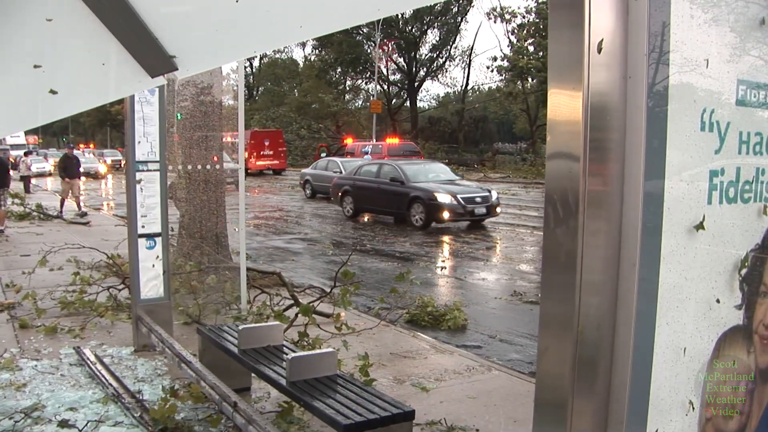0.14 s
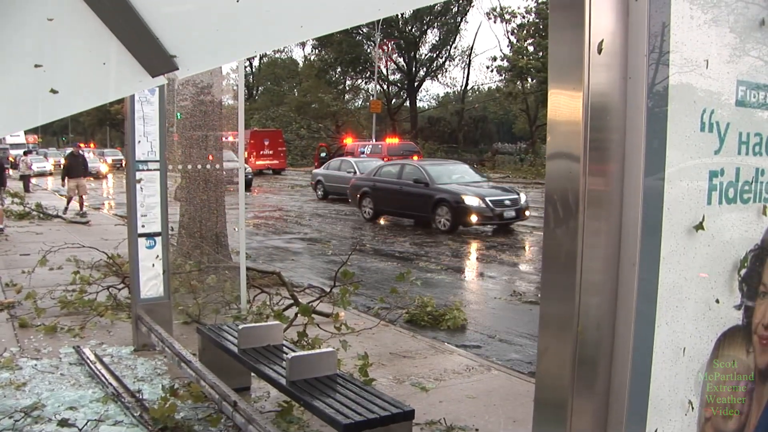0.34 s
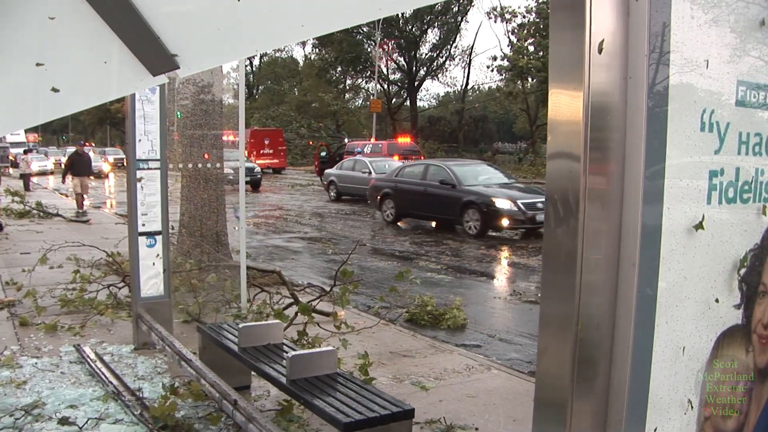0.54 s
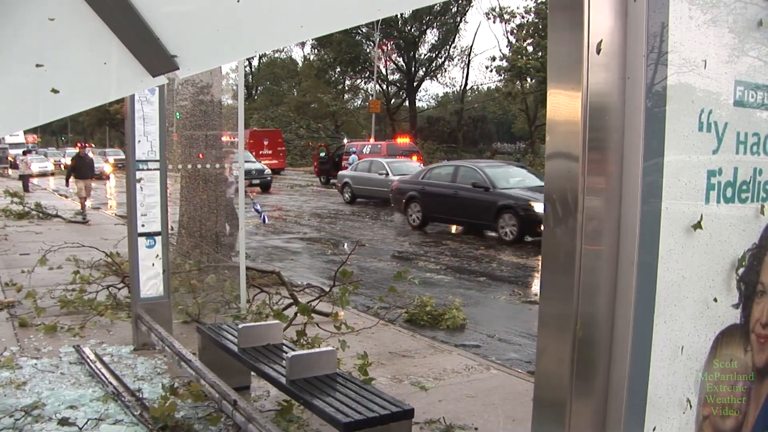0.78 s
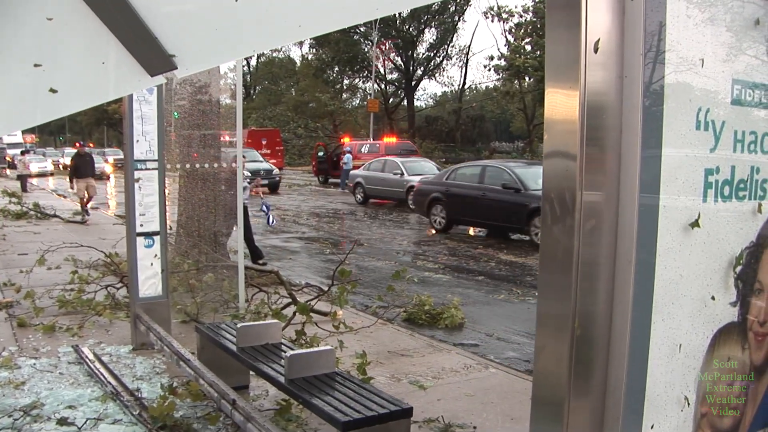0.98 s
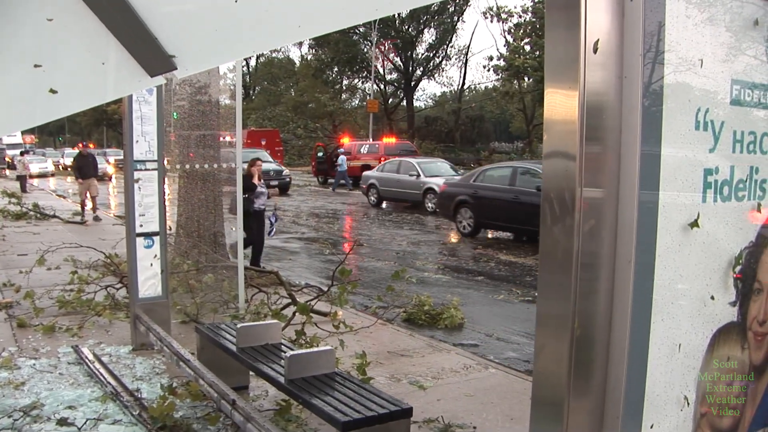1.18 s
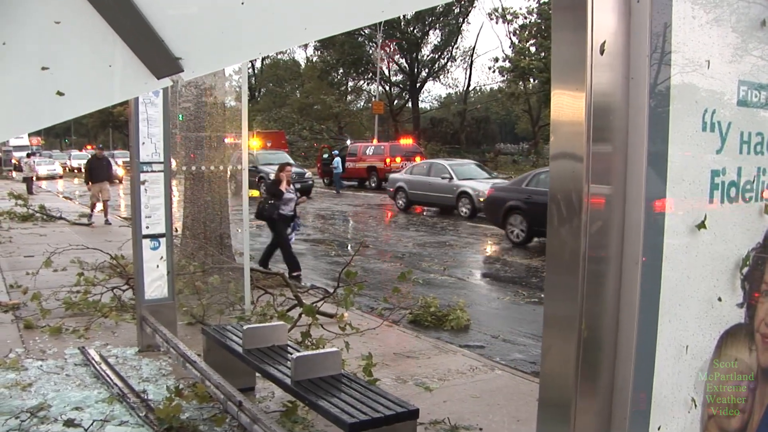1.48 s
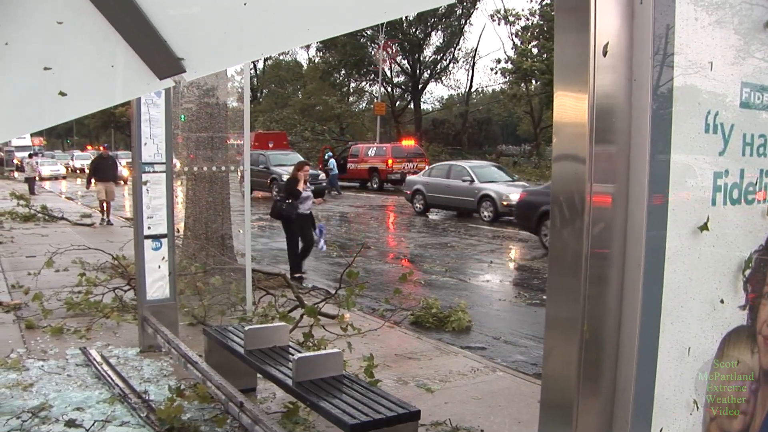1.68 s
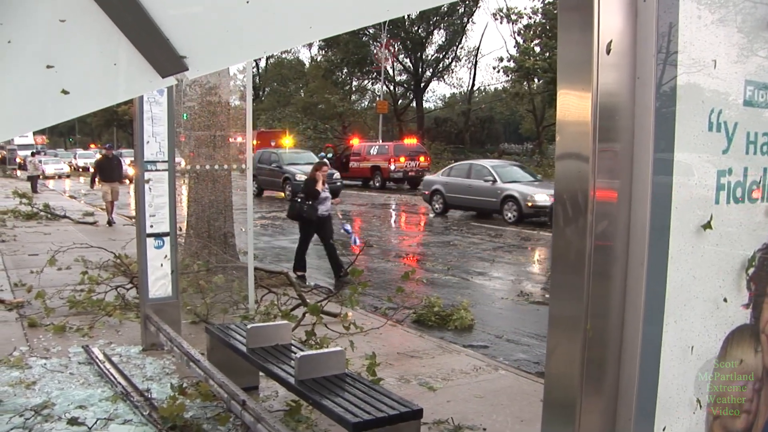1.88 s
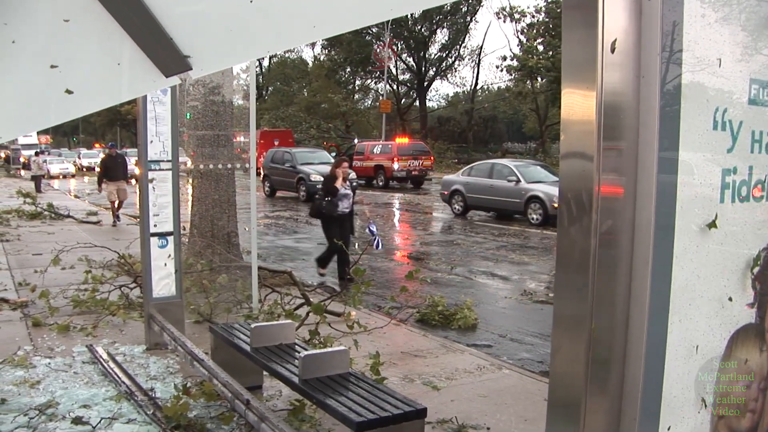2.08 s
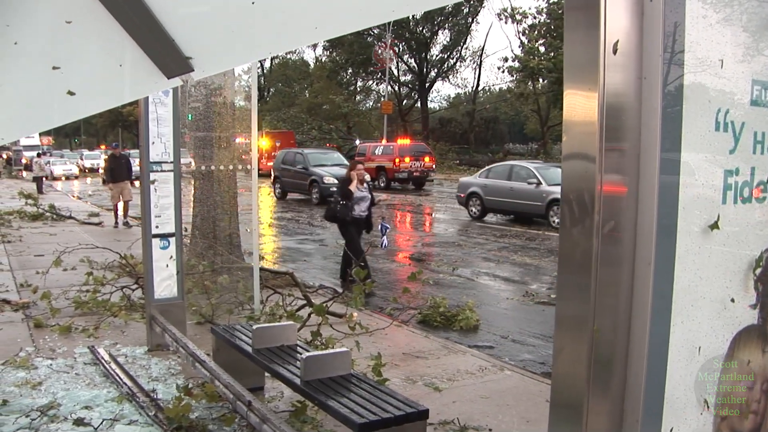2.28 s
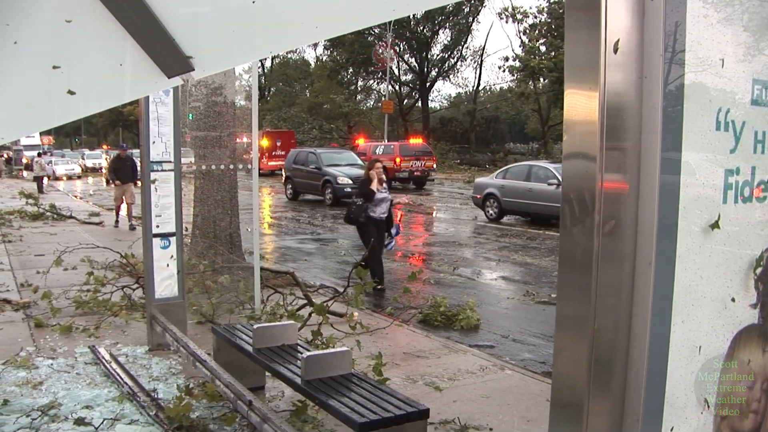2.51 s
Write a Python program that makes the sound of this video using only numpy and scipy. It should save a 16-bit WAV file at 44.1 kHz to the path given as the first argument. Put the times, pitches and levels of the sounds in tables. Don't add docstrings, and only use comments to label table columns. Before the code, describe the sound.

Car tyres hiss and spit on a wet city road, gradually moving away, over a low lorry idle that sinks in pitch; a faint distant horn toot midway, heard in stereo from a kerbside shelter.

```python
import sys
import numpy as np
from scipy import signal
from scipy.fft import rfft, irfft, next_fast_len
from scipy.io import wavfile
from scipy.ndimage import uniform_filter1d

SR = 44100
rng = np.random.default_rng(int(sys.argv[2]) if len(sys.argv) > 2 else 0)


def level_to_linear(level):
    exponent = np.asarray(level, float) / 20
    return 10 ** exponent


def dump_mix(stems):
    frames = np.atleast_2d(stems).T
    limited = np.clip(frames, -1, 1)
    pcm = np.round(limited * 32767).astype(np.int16)
    wavfile.write(sys.argv[1], SR, pcm)


N = 116865
T = np.arange(N) / SR

# centre [t/s], length [t/s], [level/dB]
GUSTS = [
    (1.772, 0.063, -57),
    (2.4, 0.073, -59),
]
# [multiple of pitch], [level/dB]
HORN_ORDERS = [(1, 0), (6, -11), (8, -8), (9, -9), (10, -5)]
# [t/s], [f/Hz], [level/dB]
PUMP_WHINE = [(0, 1236, -60), (.55, 1236, -53), (1.0, 1236, -57), (1.5, 1236, -55), (2.05, 1237, -56),
              (2.15, 1238, -49), (2.33, 1236, -49), (2.42, 1236, -58), (2.65, 1236, -62)]
SHIELD_RATTLE = [(1.95, 2452, -78), (2.15, 2455, -47), (2.3, 2450, -46), (2.36, 2440, -50),
                 (2.45, 2455, -48), (2.55, 2455, -69)]
GEAR_WHINE = [(1.9, 760, -70), (2.1, 772, -55), (2.3, 800, -54), (2.45, 825, -56), (2.65, 835, -56)]
FAN_WHINE = [(.8, 316, -57.5), (1.1, 315, -48), (1.7, 312, -48), (2.2, 306.6, -49), (2.65, 305, -51.5)]
# [t/s], [f/Hz], [level/dB], [left over right/dB]
SQUEAK_LOW = [
    (.235, 12830, -66, -6),
    (.25, 12815, -50, -6.5),
    (.3, 12785, -51, -5.5),
    (.365, 12775, -47, -7),
    (.382, 12775, -62, -7),
    (.4, 12772, -41, -6),
    (.46, 12775, -44, -3),
    (.49, 12780, -58, -3),
]
SQUEAK_HIGH = [(.385, 12845, -62, -5), (.41, 12845, -48, -5), (.47, 12845, -52, -3), (.52, 12848, -50, -2),
               (.575, 12850, -50, -1), (.59, 12850, -68, -1)]
# [t/s], firing [f/Hz], firing [level/dB], second order [level/dB]
LORRY = [
    (0, 92.6, -30, -39),
    (.3, 92.3, -28.5, -34.5),
    (.7, 92.1, -30, -38.5),
    (1.0, 90.8, -33, -37.5),
    (1.4, 89.5, -34.5, -47),
    (1.85, 87.3, -33, -47.5),
    (2.1, 84.33, -34.5, -48.5),
    (2.65, 82.56, -43, -44),
]
# [t/s], firing [f/Hz], [level/dB]
CAR = [
    (0, 150, -42),
    (.35, 150, -34),
    (.75, 145, -40),
    (1.2, 136, -37),
    (1.7, 130, -38),
    (2.1, 128, -37),
    (2.28, 148, -42),
    (2.42, 165, -33),
    (2.65, 168, -33),
]
# [multiple of firing pitch], [level/dB]
CAR_ORDERS = [(1.0, 0), (.667, -7), (1.5, -18)]
# [t/s], [level/dB]
NEARNESS = [
    (0.0, -32),
    (1.38, -34.5),
    (2.09, -36),
    (2.23, -35.5),
    (2.63, -36),
    (2.65, -36),
]
# [f/Hz], [level/dB]
RUMBLE = [(12, -49), (20, -23), (37, -5), (69, -2.5), (97, -4.5), (198, -2.5), (397, -16), (600, -21),
          (780, -44), (1320, -120)]
RUMBLE_SIDE = [(12, -64), (20, -32), (81, -13), (179, -1), (259, -7), (316, -1.5), (600, -11), (780, -37),
               (1320, -120)]
HISS = [(290, -19.5), (500, -7.5), (652, -6.5), (2080, -.5), (2990, -1), (3940, -7), (4500, -16.5),
        (5950, -18), (6300, -26), (6750, -33), (7400, -50)]
HISS_SIDE = [(290, -34), (500, -2.5), (1490, 0.5), (2400, -3), (3090, -12), (4260, -3), (5080, -10.5),
             (5800, -1.5), (7000, -19), (9100, -42), (15400, -120)]
SPRAY = [(6600, -30), (6900, -21), (7750, -19), (8450, -9), (11500, -4), (14200, -3.5), (15500, -8)]
SPRAY_SIDE = [(6000, -33), (7300, -1), (8950, 2), (10600, -7), (13500, 0), (14200, -6), (15500, -6)]
# [f/Hz], [level/dB]
PATCH_COLOUR = [(6100, -20), (6250, 2), (6900, -1), (7700, -1), (8250, 3), (8400, -20)]
# start [t/s], end [t/s]
NOISE_PATCHES = [(0, .04), (.06, .14), (.2, .28), (.44, .49), (.6, .67), (.7, .735), (.77, .806), (.84, .88),
                 (1.14, 1.2), (1.28, 1.32), (1.46, 1.52), (1.555, 1.6), (1.69, 1.735), (1.86, 1.97),
                 (2.09, 2.13), (2.17, 2.29), (2.41, 2.46), (2.5, 2.65)]
# [t/s], peak [level/dB], decay [t/s]
SPLASHES = [
    (.1915, -38, .003),
    (.7872, -25, .0018),
    (.83, -37, .003),
    (.929, -33, .0035),
    (1.1987, -37, .003),
    (1.507, -36, .003),
    (1.6616, -41, .003),
    (2.2633, -31, .002),
]

RUMBLE_DB, RUMBLE_SIDE_DB, RUMBLE_LEAN = -34, -48.5, 0.02
HISS_SIDE_DB, HISS_LEAN = -5.5, -0.024
SPRAY_DB, SPRAY_SIDE_DB, SPRAY_LEAN = -49, -51, -0.31
RUMBLE_FOLLOWS, SPRAY_FOLLOWS = 0.11, 2.26
SPITS_PER_S, SPIT_SPREAD_DB = 350, 4
PATCH_DB, PATCH_EDGE_S = -63.5, 0.008
HORN_S, HORN_LENGTH_S, HORN_RISE_S, HORN_FADE_S = 1.335, 0.12, 0.018, 0.036
HORN_HZ, HORN_DB, HORN_PAN_DB = 358, -43, -5
DRONE_S, DRONE_LENGTH_S, DRONE_DB, DRONE_BAND_HZ = 1.63, 0.32, -47, [293, 410]
SHELTER_LEAN, SHELTER_BAND_HZ = -0.33, [600, 1620]
LEFT_LAG_S, LAG_TOP_HZ = 0.00007, 1510
PORT_PEAK_HZ, PORT_PEAK_WIDTH_HZ, PORT_PEAK_DB = 4900, 230, 6
CUTOFF_HZ = 15100


def rms_one(x):
    return x / np.sqrt(np.mean(x ** 2) + 1e-20)


def in_time(rows):
    s, *columns = np.transpose(rows)
    return [np.interp(T, s, column) for column in columns]


def gated(rows):
    hz, db = in_time(rows)[:2]
    outside = (T < rows[0][0]) | (T > rows[-1][0])
    return hz, np.where(outside, -120, db)


def drift(rate):
    pole = np.exp(-80 * np.pi * rate / SR)
    noise = rng.standard_normal(N // 40 + 2002)
    slow = signal.lfilter([1], [1, -2 * pole, pole * pole], noise)[2000:]
    return np.interp(np.arange(N) / 40, np.arange(len(slow)), rms_one(slow - slow.mean()))


def flicker(rate):
    x = drift(rate)
    return rms_one(x - uniform_filter1d(x, size=SR // 9))


def band_noise(white, order, band_hz):
    return signal.sosfilt(signal.butter(order, band_hz, "band", fs=SR, output="sos"), white)


def coloured(white, spectrum, patchy_db=0.):
    size = next_fast_len(N)
    octave = np.log2(np.maximum(np.arange(size // 2 + 1) * SR / size, 1))
    hz, db = np.transpose(spectrum)
    shape_db = np.interp(octave, np.log2(hz), db, left=-120, right=-120)
    shaped = rfft(white, size) * level_to_linear(shape_db)
    out, shared = 0, flicker(27.0)
    for centre in np.arange(np.floor(np.log2(hz[0])), np.log2(hz[-1]) + 0.5, 0.5):
        weight = np.clip(1 - 2 * np.abs(octave - centre), 0, 1)
        swell_db = patchy_db * (0.64 * shared + flicker(42.0))
        out = out + irfft(shaped * weight, size)[:N] * level_to_linear(swell_db)
    return rms_one(out)


def ports(mid, side, lean):
    return mid * np.array([[1 + lean], [1 - lean]]) + side * np.array([[1], [-1]])


def pan(x, db):
    return np.array([x * level_to_linear(db / 2), x * level_to_linear(-db / 2)])


def tone(hz, db, orders, wobble_db, wobble_hz, rate):
    phase = 2 * np.pi * np.cumsum(hz + wobble_hz * drift(rate)) / SR
    out = 0
    for multiple, order_db in orders:
        level = level_to_linear(db + order_db + wobble_db * flicker(rate))
        out = out + level * np.sin(multiple * phase + rng.uniform(0, 2 * np.pi))
    return np.sqrt(2) * out


def single(hz, db, **wobble):
    return tone(hz, db, [(1, 0)], **wobble)


def wind():
    low = rms_one(band_noise(rng.standard_normal(N), 2, [15, 90]))
    puffs = sum(level_to_linear(db) * np.exp(-((T - s) / length) ** 2) for s, length, db in GUSTS)
    return ports(0 * T, low * puffs, 0)


def drone():
    mid, side = band_noise(rng.standard_normal((2, N)), 2, DRONE_BAND_HZ)
    swell = np.exp(-((T - DRONE_S) / DRONE_LENGTH_S) ** 2)
    return level_to_linear(DRONE_DB) * swell * ports(rms_one(mid), 0.28 * rms_one(side), 0)


def horn():
    rise = np.clip((T - HORN_S) / HORN_RISE_S, 0, 1)
    fade = np.exp(-np.maximum(T - HORN_S - HORN_LENGTH_S, 0) / HORN_FADE_S)
    toot = tone(HORN_HZ + 0 * T, HORN_DB, HORN_ORDERS, wobble_db=1.2, wobble_hz=0.4, rate=8.0)
    return pan(rise * fade * toot, HORN_PAN_DB)


def whines():
    out = pan(single(*gated(PUMP_WHINE), wobble_db=1.5, wobble_hz=3, rate=10), 7)
    out += pan(single(*gated(SHIELD_RATTLE), wobble_db=2.5, wobble_hz=9, rate=30), 1.5)
    out += pan(single(*gated(GEAR_WHINE), wobble_db=4, wobble_hz=14, rate=20), 9)
    out += pan(single(*gated(FAN_WHINE), wobble_db=3.5, wobble_hz=4, rate=12), 4)
    return out


def brake():
    out = 0
    for mode in SQUEAK_LOW, SQUEAK_HIGH:
        pan_db = in_time(mode)[2]
        out = out + pan(single(*gated(mode), wobble_db=2, wobble_hz=10, rate=45), pan_db)
    return out


def engines():
    hz, db, second_db = in_time(LORRY)
    lorry = single(hz, db, wobble_db=0.9 + 0.7 * T, wobble_hz=0.4 + 1.1 * T, rate=30)
    lorry += single(2 * hz, second_db, wobble_db=2.5, wobble_hz=3, rate=12)
    car = tone(*in_time(CAR), CAR_ORDERS, wobble_db=1.6, wobble_hz=2.2, rate=18)
    return pan(lorry, 0.38) + pan(car, 0.28)


def rumble(mid, side):
    return ports(level_to_linear(RUMBLE_DB) * coloured(mid, RUMBLE, patchy_db=-0.56),
                 level_to_linear(RUMBLE_SIDE_DB) * coloured(side, RUMBLE_SIDE), RUMBLE_LEAN)


def noise_patches():
    opening = 0
    for start, end in NOISE_PATCHES:
        opening = opening + np.clip(np.minimum(T - start, end - T) / PATCH_EDGE_S + 0.5, 0, 1)
    return level_to_linear(PATCH_DB) * opening * coloured(rng.standard_normal(N), PATCH_COLOUR, patchy_db=1.5)


def spray(mid, side):
    sizes = level_to_linear(SPIT_SPREAD_DB * np.minimum(rng.exponential(1, N), 4))
    spits = sizes * (rng.random(N) < SPITS_PER_S / SR)
    burst = 1 + uniform_filter1d(rms_one(spits), size=12)
    return ports(level_to_linear(SPRAY_DB) * coloured(mid * burst, SPRAY, patchy_db=0.74),
                 level_to_linear(SPRAY_SIDE_DB) * coloured(side * burst, SPRAY_SIDE, patchy_db=-0.5), SPRAY_LEAN)


def splashes():
    envelope = sum(level_to_linear(db) * np.exp(-np.maximum(T - s, 0) / decay) * (T >= s) for s, db, decay in SPLASHES)
    treble = signal.butter(2, 11500, "high", fs=SR, output="sos")
    mid, side = signal.sosfilt(treble, rng.standard_normal((2, N)))
    return envelope * ports(mid, 0.66 * side, SPRAY_LEAN)


def hiss(mid, side):
    tread = ports(coloured(mid, HISS, patchy_db=0.88),
                  level_to_linear(HISS_SIDE_DB) * coloured(side, HISS_SIDE, patchy_db=1.5), HISS_LEAN)
    reflected = band_noise(tread.mean(axis=0), 1, SHELTER_BAND_HZ)
    return tread + ports(0, SHELTER_LEAN * reflected, 0)


def road():
    near_db, = in_time(NEARNESS)
    swing_db = near_db - near_db.mean()
    white = rng.standard_normal((6, N))
    out = level_to_linear(RUMBLE_FOLLOWS * swing_db) * rumble(*white[:2])
    out += level_to_linear(near_db) * hiss(*white[2:4])
    fine = spray(*white[4:])
    out += splashes()
    return out + level_to_linear(SPRAY_FOLLOWS * swing_db) * (fine + noise_patches())


def left_lag(street):
    lowpass = signal.butter(1, LAG_TOP_HZ, fs=SR, output="sos")
    low = signal.sosfiltfilt(lowpass, street.mean(axis=0))
    return ports(0, -LEFT_LAG_S * SR / 2 * np.gradient(low), 0)


def scene():
    street = road() + engines()
    return street + left_lag(street) + whines() + brake() + horn() + wind() + drone()


def top_cut(x):
    return signal.sosfilt(signal.butter(12, 15720, fs=SR, output="sos"), x)


def record(dry):
    cavity = signal.iirpeak(PORT_PEAK_HZ, PORT_PEAK_HZ / PORT_PEAK_WIDTH_HZ, fs=SR)
    peak = signal.lfilter(*cavity, dry.mean(axis=0))
    lifted = dry + (level_to_linear(PORT_PEAK_DB) - 1) * peak
    steep = signal.ellip(10, 0.5, 24, CUTOFF_HZ, fs=SR, output="sos")
    return top_cut(signal.sosfilt(steep, lifted))


dry = scene()
out = record(dry)
dump_mix(out)
```